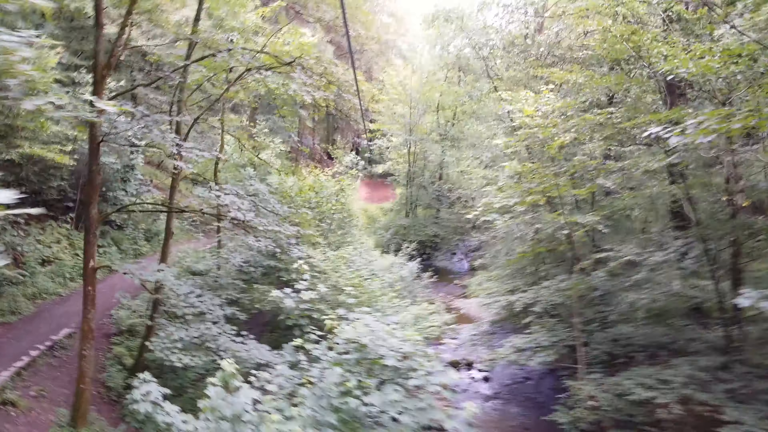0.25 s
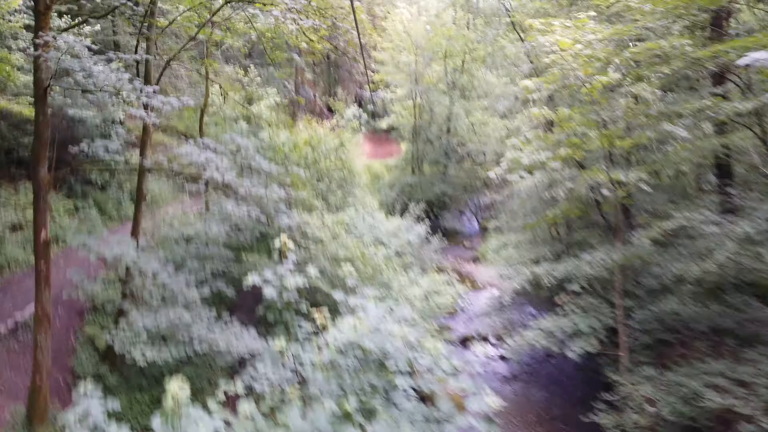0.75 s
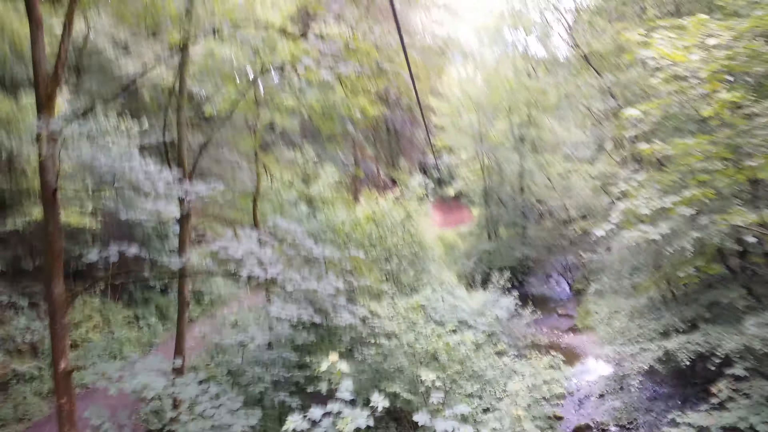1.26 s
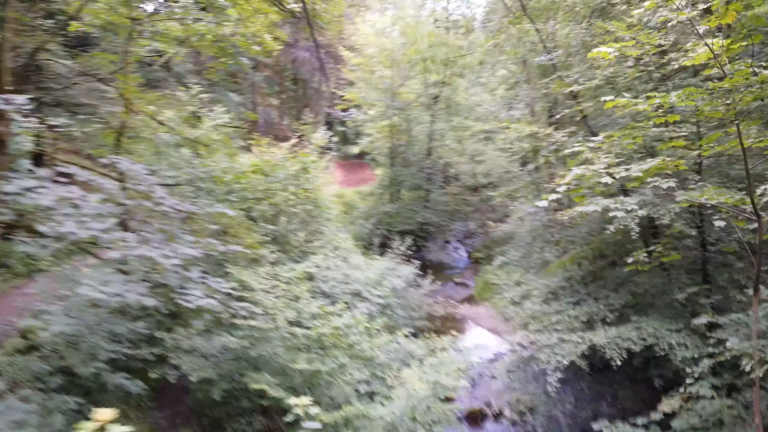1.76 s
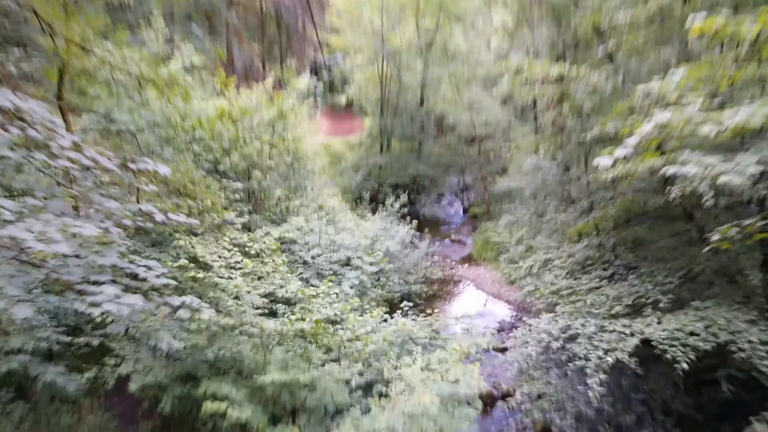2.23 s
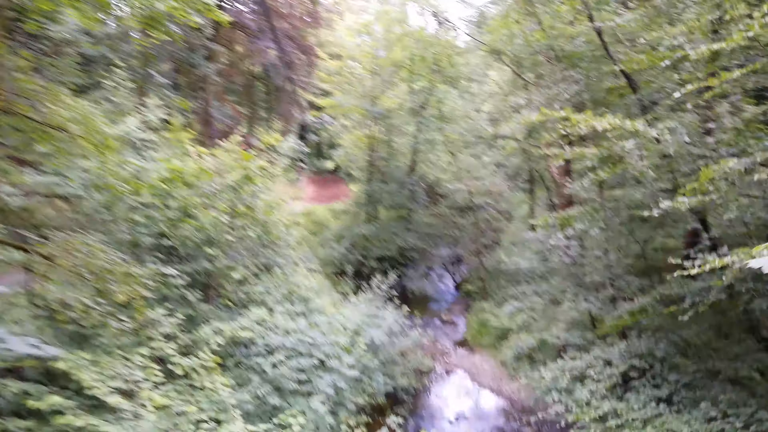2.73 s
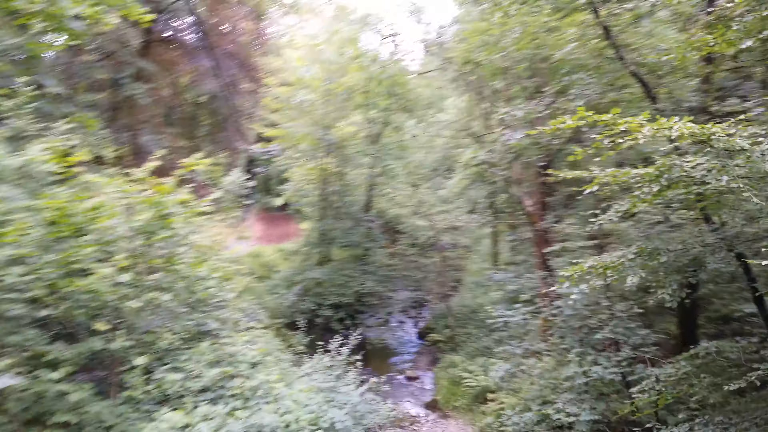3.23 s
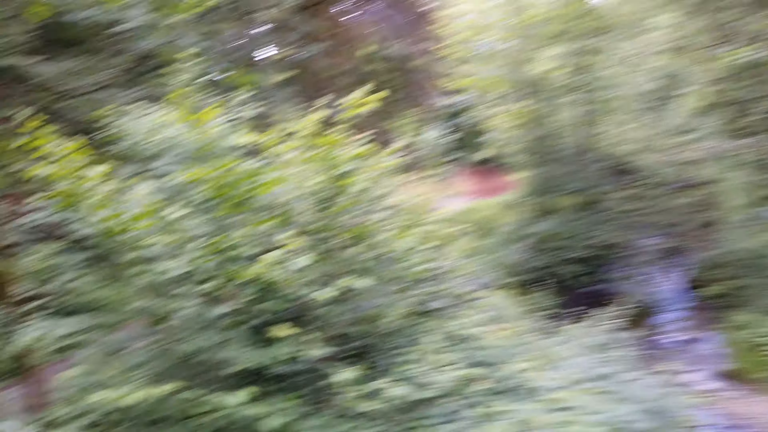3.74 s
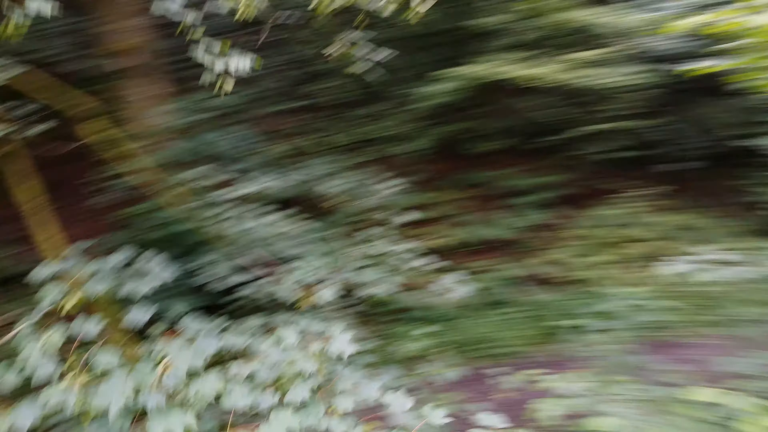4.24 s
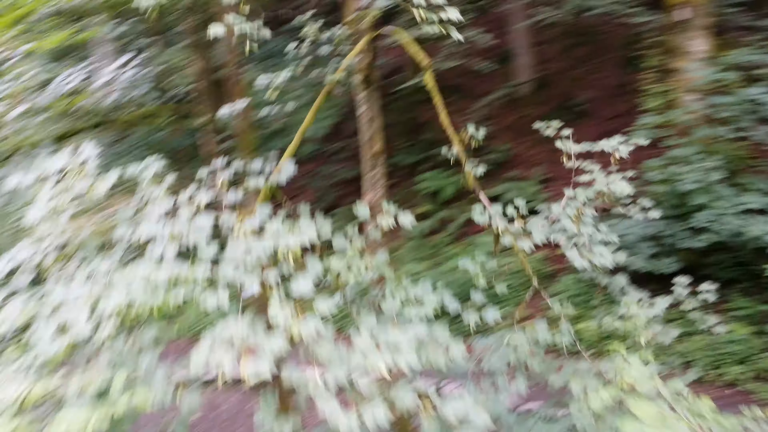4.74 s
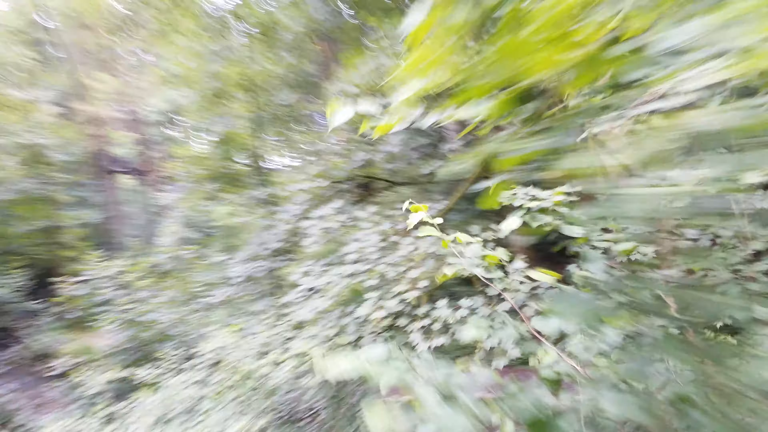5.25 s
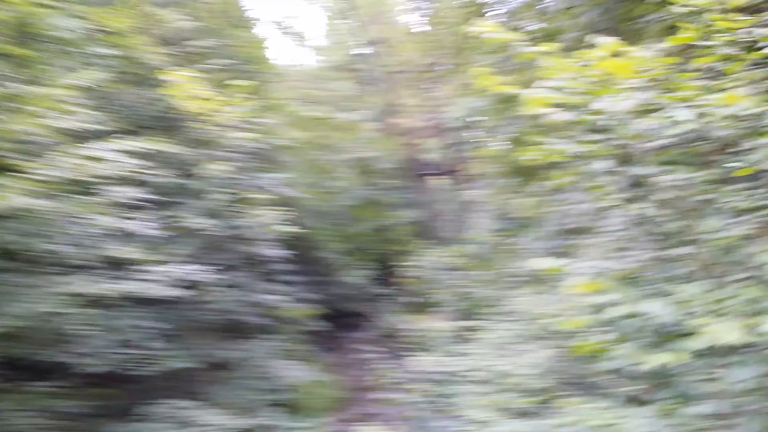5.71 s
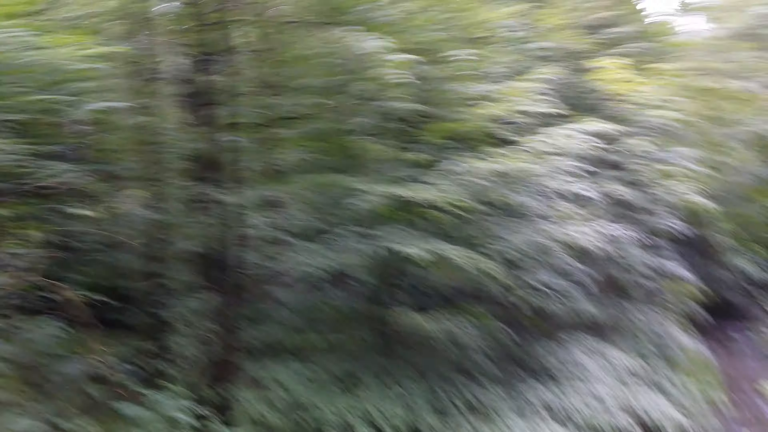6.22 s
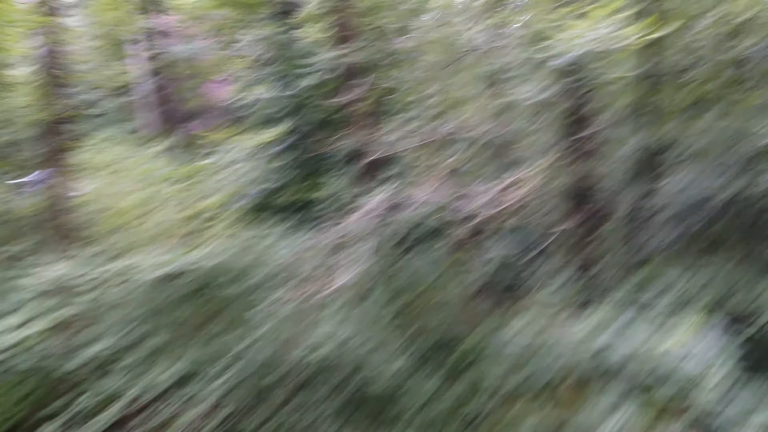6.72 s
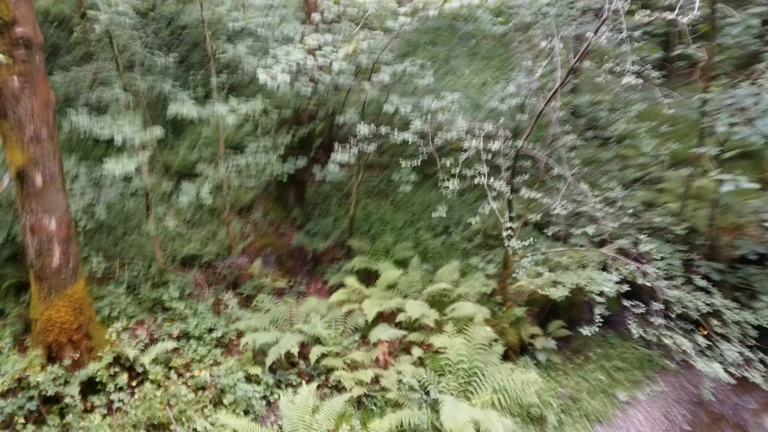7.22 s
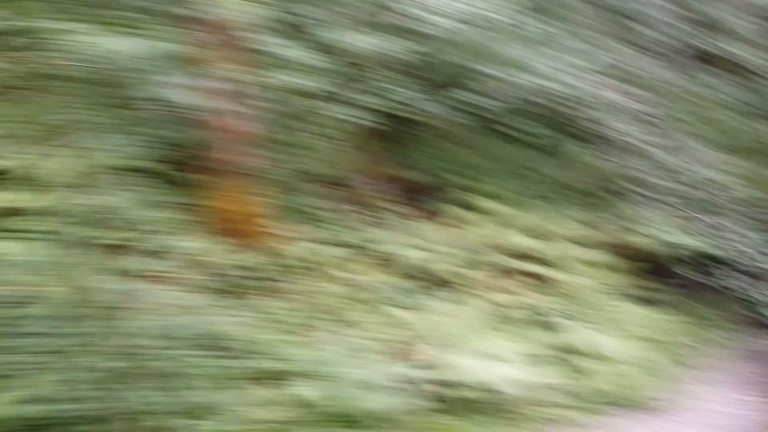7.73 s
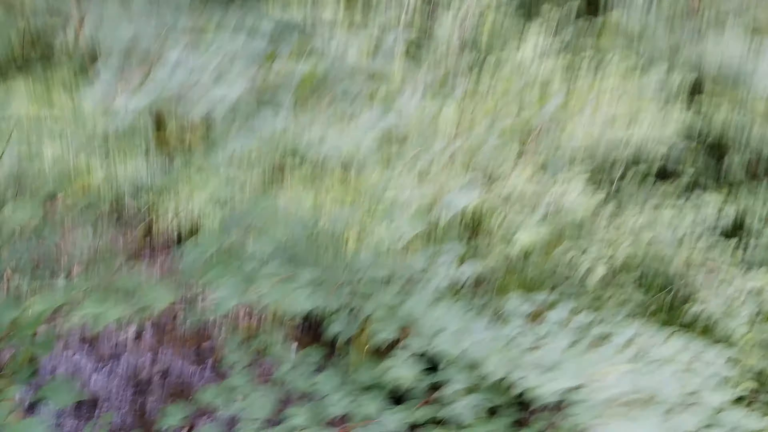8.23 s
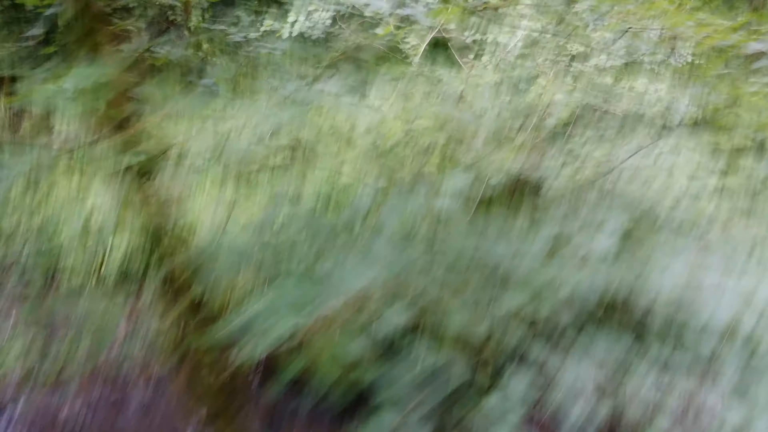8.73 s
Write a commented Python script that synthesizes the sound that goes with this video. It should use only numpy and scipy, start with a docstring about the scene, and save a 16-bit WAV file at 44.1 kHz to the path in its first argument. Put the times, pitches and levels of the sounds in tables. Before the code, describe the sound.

Trolley wheels hiss steadily along a steel cable with a low strand hum, while wind buffets grow into heavy thumps and a twig scrapes past.

```python
"""A rider glides down a zip line through woodland; friction and periodic excitation make the sound.
From the start the trolley's wheels hiss over the stranded cable and hum at the rate at which the strands pass.
The hiss swings between the ears as the rider twists; from about one second, narrow resonances swell and slide.
From halfway turbulence buffets the microphone ports and leaves swish past; then a twig scrapes by on the left
while the rocking trolley whines, and single eddies thump the ports until near the end."""
import sys
import numpy as np
from scipy import signal
from scipy.fft import rfft, irfft, next_fast_len
from scipy.io import wavfile
from scipy.ndimage import map_coordinates

SR = 44100
rng = np.random.default_rng(int(sys.argv[2]) if len(sys.argv) > 2 else 0)


def log_audio(samples):
    """Write samples as a 16-bit WAV file to the path given in sys.argv[1]."""
    # one column per channel
    frames = np.atleast_2d(samples).T
    # limit to full scale, then quantise
    limited = np.clip(frames, -1, 1)
    pcm = np.round(limited * 32767).astype(np.int16)
    wavfile.write(sys.argv[1], SR, pcm)


N = 395577
TIME = np.arange(N) / SR
SIZE = next_fast_len(N)
FREQ = np.maximum(np.arange(SIZE // 2 + 1) * SR / SIZE, 1)


def from_db(db):
    """Logarithmic level: decibels to amplitude gain."""
    return 10 ** (np.asarray(db) / 20)


def rms_one(x):
    """Normalisation: scale to rms 1."""
    return x / np.sqrt(np.mean(x ** 2) + 1e-20)


def in_time(rows):
    """Linear interpolation: each column of a curve at every sample."""
    s, *columns = np.transpose(rows)
    return [np.interp(TIME, s, c) for c in columns]


def in_freq(rows):
    """Interpolation over log frequency: each column of a spectrum at every frequency."""
    hz, *columns = np.transpose(rows)
    return np.array([np.interp(np.log(FREQ), np.log(hz), c) for c in columns])


def shaped(x, gain):
    """Linear filtering: a noise passes through one gain per frequency."""
    return irfft(rfft(x, SIZE) * gain, SIZE)[..., :N]


def peak(hz, width_hz):
    """Lorentzian resonance: power response, 1 on top."""
    return 1 / (1 + (2 * (FREQ - hz) / width_hz) ** 2)


def bell(s, half_s):
    """Gaussian envelope: a smooth rise and fall around a moment, 1 on top."""
    out = np.zeros(N)
    near = slice(*np.searchsorted(TIME, [s - 5 * half_s, s + 5 * half_s]))
    out[near] = np.exp(-((TIME[near] - s) / half_s) ** 2 / 2)
    return out


def drift(rate):
    """Low-passed random process: spread 1, changing about rate times a second."""
    # computed at one sample in 40; the first 2000 values let the filter settle
    r = np.exp(-80 * np.pi * rate / SR)
    slow = signal.lfilter([1], [1, -2 * r, r * r], rng.standard_normal(N // 40 + 2002))[2000:]
    return np.interp(np.arange(N) / 40, np.arange(len(slow)), rms_one(slow))


def contacts(per_s, spread_db, share):
    """Rubbing contact: random clicks of uneven size in a smooth hiss, share being the clicks' power."""
    sizes = from_db(spread_db * np.minimum(rng.exponential(1, N), 4)) * rng.choice([-1, 1], N)
    clicks = rms_one(sizes * (rng.random(N) < per_s / SR))
    share = np.clip(share, 0, 1)
    return np.sqrt(share) * clicks + np.sqrt(1 - share) * rng.standard_normal(N)


def sided(pan_db):
    """Level difference between the ears: the far one is turned down."""
    return from_db(np.minimum([[pan_db], [-pan_db]], 0))


# airflow over the microphone ports, before the trim: (time [s], left level [dB], right level [dB])
AIRFLOW = [(0, -47, -55), (.7, -41, -68), (1.5, -52, -54), (2.8, -48, -75), (3.7, -47, -60),
           (3.95, -49, -37), (4.2, -46, -34.5), (4.4, -33, -44), (4.6, -30.5, -26.5), (4.8, -41, -23.5),
           (5.0, -34, -32), (5.4, -41.5, -37), (5.55, -36, -26), (5.7, -34, -26.5), (6.0, -46, -36.5),
           (6.1, -34, -22.5), (6.3, -33, -30.5), (6.55, -24, -24), (6.75, -49, -22.5), (7.35, -53, -28),
           (7.65, -46, -26.5), (7.9, -74, -29), (8.35, -53, -24.5), (8.6, -75, -24), (8.97, -56, -30.5)]
# gusts that favour one port, before the trim: (time [s], half length [s], level [dB], left minus right [dB])
PORT_GUSTS = [(0.182, 0.017, -40.5, -13), (0.32, 0.018, -41, -11), (0.406, .015, -42.5, -7),
              (1.362, 0.02, -39.5, 4), (2.06, 0.022, -41.5, -20), (2.165, 0.017, -39.5, -22),
              (2.379, 0.0095, -37, 9), (2.943, 0.012, -36, 5), (3.059, 0.018, -38, -7),
              (3.556, 0.024, -36, 35), (3.781, 0.015, -36, 7), (3.909, 0.013, -34.5, 4),
              (4.09, 0.014, -29, -19), (4.797, 0.031, -24, -29), (5.843, 0.025, -27.5, 18),
              (6.285, 0.0069, -18, 22), (6.341, 0.0073, -16.5, 18), (6.463, 0.042, -20.5, 5),
              (6.937, 0.017, -22, -30), (7.561, 0.03, -26, -21), (7.724, 0.024, -18.5, -24),
              (8.302, 0.03, -16.5, -41), (8.769, 0.014, -19, -41)]


def airflow_db():
    """Power addition: the level of the wind at each port is the airflow with the gusts on top."""
    gusts = sum((from_db(db) * sided(pan_db)) ** 2 * bell(s, half_s) for s, half_s, db, pan_db in PORT_GUSTS)
    return 10 * np.log10(from_db(in_time(AIRFLOW)) ** 2 + gusts)


# relative spectrum of the wind: (frequency [Hz], gain [dB])
WIND_SPECTRUM = [(20, -42), (50, -6.5), (95, -0.5), (170, -1.5), (300, -7), (500, -11.5), (900, -18),
                 (2000, -28), (5000, -60)]
TEAR_SLOPE, TEAR_FROM_DB = 0.05, -19   # growth of the upper turbulence [dB per dB], and its reference level


def wind(lumpy_db, flicker_db, steady_above_db, trim_db):
    """Turbulent pressure: lumpy buffets at each port; faint, dull low noise flickers while the wind is weak."""
    gain = from_db(in_freq(WIND_SPECTRUM)[0])
    rumble = 1 / (1 + (FREQ / 330) ** 4)
    ports = []
    for level_db in airflow_db():
        eddies = from_db(lumpy_db * np.minimum(drift(24.0), 1.8))
        white = rng.standard_normal(N)
        # the strongest eddies also tear higher up
        tear = rms_one(white * eddies ** 1.7) * from_db(TEAR_SLOPE * (level_db - TEAR_FROM_DB))
        low = shaped(rms_one(white * eddies), gain * rumble)
        buffets = rms_one(low + shaped(tear, gain * (1 - rumble)))
        # the dull low noise flickers on and off at random
        flicker = from_db(flicker_db * np.tanh(2 * drift(8) - 1))
        dull = rms_one(shaped(rng.standard_normal(N) * flicker, gain / (1 + (FREQ / 215) ** 12)))
        strong = 1 / (1 + from_db(10 * (steady_above_db - level_db)))
        mix = np.sqrt(strong) * buffets + np.sqrt(1 - strong) * dull
        ports.append(mix * from_db(level_db + trim_db))
    return np.array(ports)


# single eddies thump a port: (time [s], nominal level [dB], left minus right [dB])
PORT_THUMPS = [(5.554, -6.5, -22), (5.585, -9.5, -17), (5.64, -9, -18), (6.059, -13.5, -16),
               (6.131, -14, -18), (6.337, -9, 18), (6.444, -14, 3), (6.475, -11, -2), (6.54, -23, 12),
               (6.561, -15, -14), (6.713, -10.5, -32), (6.744, -10, -30), (6.885, -19, -30),
               (6.937, -16, -34), (7.556, -17, 12), (7.728, -18, -22), (7.745, -7.5, -36),
               (8.048, -9.5, -52)]
THUMP_S = 0.0077   # nominal length [s], varied at random
THUMP_EDGE = 0.5   # share of a thump that arrives as a sharp front


def thumps():
    """Pressure pulse: an eddy pushes the membrane in, then tips over with a sharp front and sucks it out."""
    out = np.zeros((2, N))
    for s, db, pan_db in PORT_THUMPS:
        near = np.abs(TIME - s) < 4 * THUMP_S
        u = (TIME[near] - s) / (THUMP_S / 4 * rng.uniform(.75, 1.3))
        u = np.where(u < 0, u * 2, u)   # the push is shorter than the suction
        front = np.tanh(12 * u) * np.exp(-np.abs(u))
        push = (1 - THUMP_EDGE) * 2 * u * np.exp(-u * u) + THUMP_EDGE * front
        out[:, near] -= push * from_db(db) * sided(pan_db)
    return out


# a twig brushes past, level at the left ear: (time [s], level [dB])
TWIG_LEVEL = [(5.04, -75), (5.072, -21), (5.088, -15), (5.122, -15), (5.14, -24.5), (5.22, -26), (5.3, -44)]
# relative spectrum of the scrape: (frequency [Hz], gain [dB])
TWIG_SPECTRUM = [(60, 23), (300, 25), (550, 24.5), (900, 23.5), (1400, 20), (2200, 16), (4000, 17.5),
                 (14000, 9)]
# one swish of leaves, level at the left ear: (time [s], half length [s], level [dB])
LEAF_SWISH = (4.4, .024, -24)
SWISH_HZ, SWISH_WIDTH_HZ = 9060, 3400


def twig(right_db):
    """Frictional noise: leaves swish past, then a twig scrapes by in one short, dull swipe."""
    s, half_s, db = LEAF_SWISH
    rustle = rms_one(shaped(rng.standard_normal(N), np.sqrt(peak(SWISH_HZ, SWISH_WIDTH_HZ))))
    leaves = rustle * bell(s, half_s) * from_db(db)
    scrape = np.array([contacts(per_s=820, spread_db=3.5, share=0.76) for ear in range(2)])
    swipe = rms_one(shaped(scrape, from_db(in_freq(TWIG_SPECTRUM)[0])))
    passing = (TIME > TWIG_LEVEL[0][0]) & (TIME < TWIG_LEVEL[-1][0])
    return (swipe * passing * from_db(in_time(TWIG_LEVEL)[0]) + leaves) * from_db([[0], [right_db]])


# a resonance swells and slides as the wheel flange leans on the cable, level at the right ear:
# (time [s], half length [s], centre [Hz], glide [Hz/s], width [Hz], level [dB])
FLANGE_SWELLS = [(1.103, .7, 6430, 0, 600, -24.5), (1.951, .4, 9600, -1.5, 500, -24),
                 (3.05, .42, 3284, 101.5, 300.2, -32.5), (3.249, 0.23, 10520, 201, 656, -26.5),
                 (3.731, 0.13, 7480, 508, 1000, -17.5), (3.747, 0.067, 4640, 9, 700, -33),
                 (4.076, 0.14, 7650, -1800, 950, -17), (4.272, .08, 9330, 0, 500, -22),
                 (4.896, 0.52, 8460, -9.5, 910, -22), (5.052, 0.11, 9500, 6, 500, -22),
                 (5.846, 0.22, 12460, 1, 1713, -22.5), (5.9, 0.19, 7300, -1500, 900, -21),
                 (6.3, 0.24, 8320, 1492, 800, -23), (6.897, .7, 4696, 0.5, 690, -29),
                 (6.973, 0.3, 9300, -500, 700, -25), (7.299, 0.89, 1273, -61, 169, -36),
                 (7.7, 0.26, 11170, 590.5, 849, -21.5), (7.703, 0.18, 7190, -3.5, 600, -26),
                 (8.3, 0.3, 9510, 101, 520, -19.5), (8.4, .4, 13700, -2, 1400, -28),
                 (8.3, 0.29, 3240, 2, 300, -30.5), (8.676, .22, 10570, 900.5, 1008, -22.5)]


def flange_swells(left_db, uneven_db, wander_hz):
    """Resonant noise: narrow, sliding bands sing out, unsteady in level and pitch, mostly on the right."""
    out = np.zeros((2, N))
    white = rng.standard_normal((2, N)) + 1j * rng.standard_normal((2, N))
    flutter = from_db(uneven_db * np.minimum(drift(16), 1.6))
    wander = wander_hz * drift(9)
    for s, half_s, hz, glide, width, db in FLANGE_SWELLS:
        near = slice(*np.searchsorted(TIME, [s - 3 * half_s, s + 3 * half_s]))
        t = TIME[near] - s
        # each swell takes its own random stretch of the noise
        own = rng.integers(N - len(t) + 1) + np.arange(len(t))
        grain = signal.sosfilt(signal.butter(2, width / 2, fs=SR, output="sos"), white[:, own])
        centre = hz + glide * t + wander[own]
        carrier = np.exp(2j * np.pi * np.cumsum(centre) / SR)
        band = rms_one((grain * flutter[own] * carrier).real)
        out[:, near] += band * from_db(db) * np.exp(-(t / half_s) ** 2 / 2)
    return out * from_db([[left_db], [0]])


# passing strands and their load, before the rock and the unevenness:
# (time [s], passing rate [Hz], fundamental level [dB], octave level [dB])
STRAND_PASSAGE = [(0, 403, -48, -42), (.17, 401.4, -42.5, -44), (.35, 417.4, -46.5, -42.5),
                  (.85, 404, -49.5, -43.5), (1.45, 420, -45, -46), (1.7, 410, -51, -47),
                  (1.92, 423, -46, -47), (2.1, 410, -43.5, -48), (2.45, 423, -47.5, -49),
                  (2.62, 402.5, -52.5, -51), (2.88, 423.6, -46.5, -48.5), (3.55, 411.7, -48.5, -45),
                  (4.4, 432.5, -43.5, -44), (4.6, 403, -51, -42.5), (5.0, 423, -51, -51),
                  (5.2, 412.6, -43, -39.5), (5.45, 414, -51, -43.5), (5.8, 420.7, -48.5, -45),
                  (6.55, 412, -41, -40), (6.9, 406.7, -48, -40), (7.1, 389.6, -46, -39),
                  (7.55, 398.4, -47, -46), (7.75, 423, -51, -41), (8.12, 352.7, -51, -40.5),
                  (8.27, 359.7, -53, -50), (8.45, 405, -52, -43), (8.97, 372, -50, -45)]
# the trolley rocks: (time [s], relative change of the passing rate [fraction], rise of the octave [dB])
TROLLEY_ROCK = [(5.13, 0, 0), (5.17, -.025, 6), (5.21, -.035, 12.5), (5.27, .065, 7.5), (5.3, .05, 0),
                (5.34, -.025, 4), (5.41, -.02, 6), (5.47, .08, 2), (5.52, 0, 0)]


def strand_phase(waver):
    """Phase as the integral of frequency: passing strands, their rate bent by each rock of the trolley."""
    rate_hz = in_time(STRAND_PASSAGE)[0] * (1 + in_time(TROLLEY_ROCK)[0]) * (1 + waver)
    return 2 * np.pi * np.cumsum(rate_hz) / SR


# the lowest partial is faint for a moment: (time [s], half length [s], depth [dB])
FAINT_MOMENTS = [(1.126, 0.049, 22), (2.353, 0.028, 30)]
WHINE_TURN = 0.8   # the rock also turns the left ear to the wheel: dB between the ears per dB of whine


def strand_hum(jitter, sway, rough_db, broken_db, third_db, fourth_db, left_db):
    """Periodic excitation: two wheels bump over the strands, a rolling tone whose octave whines on a rock."""
    _, first_db, octave_db = in_time(STRAND_PASSAGE)
    _, whine_db = in_time(TROLLEY_ROCK)
    faint_db = sum(db * bell(s, half_s) for s, half_s, db in FAINT_MOMENTS)
    loose = from_db(-0.3 * whine_db)   # a wheel pressed hard on the cable runs truer
    partials = (
        (first_db - faint_db, rough_db),
        (octave_db + whine_db, broken_db),
        (octave_db + third_db, broken_db),
        (octave_db + fourth_db, broken_db),
    )
    out = np.zeros((2, N))
    for wheel_gain in (1, 0.68 * loose):
        phase = strand_phase(loose * (jitter * drift(50) + sway * drift(11)))
        for k, (db, uneven_db) in enumerate(partials, 1):
            scatter = .33 * (k - .5) * loose * drift(45)   # radians; higher partials blur more
            ears = np.sin(k * phase + scatter + np.array([[.3], [0]]))
            uneven = np.minimum(drift(19), 1.4) - .35
            out += ears * (np.sqrt(2) * wheel_gain * from_db(db + loose * uneven_db * uneven))
    return out * from_db(np.array([[left_db], [0]]) + WHINE_TURN * whine_db * [[.5], [-.5]])


# hiss of the wheels on the cable, before the trim, flutter and twist: (time [s], level [dB])
HISS_LEVEL = [(0, -16), (1.1, -16.5), (1.6, -15), (3.5, -16), (4.5, -16), (5.5, -15.5), (6.0, -15),
              (7.3, -15), (8.1, -16), (8.97, -16.5)]
# relative spectrum of the hiss at each ear: (frequency [Hz], left gain [dB], right gain [dB])
HISS_SPECTRUM = [(258, -110.5, -99.2), (576, -81, -102), (700, -72, -82.5), (1005, -76, -65),
                 (1500, -79, -64.5), (1580, -74, -60), (2940, -69.5, -58), (3720, -65, -54.5),
                 (4150, -63.5, -61.5), (5050, -63.5, -55), (6520, -56.5, -50), (7530, -56.5, -49),
                 (9230, -68.5, -51), (11680, -61.5, -53), (12000, -74, -56), (15500, -63.5, -62.5)]
# a dip and the resonances of the trolley frame: (centre [Hz], width [Hz], gain [dB])
FRAME_RESONANCES = [(572, 43, -15), (1290, 500, 3.5), (3130, 66, 5.5), (9580, 420, 3)]
# the hiss dips briefly: (time [s], depth [dB])
HISS_DIPS = [(1.081, 1.5), (2.36, 2), (5.16, 3), (5.55, 1.5)]
DIP_HALF_S = 0.028
# the bands of the hiss below HOLLOW_HZ sink for a moment: (time [s], half length [s], depth [dB])
HOLLOW_MOMENTS = [(5.762, 0.051, 10), (5.92, .06, 12), (7.07, .05, 7), (7.46, 0.045, 14), (8.909, 0.08, 21)]
HOLLOW_HZ = 1150
# the rider's twist: (time [s], time by which the left ear leads [ms])
RIDER_TWIST = [(0, .12), (1.0, 0.12), (1.4, 0.18), (2.1, 0.12), (2.9, 0.14), (3.45, 0.11), (4.25, 0.28),
               (4.9, 0.12), (5.45, 0.18), (5.87, .24), (6.4, 0.12), (7.3, 0.093), (7.9, 0.035),
               (8.3, -0.023), (8.7, 0.13), (8.97, 0.06)]
REST_LEAD_MS = 0.08   # lead when the rider faces down the cable
LEFT_DB_PER_MS, RIGHT_DB_PER_MS = 19, -0.5   # twisting turns one ear to the trolley and the other away
# treble against the rest of the hiss: (time [s], left level [dB], right level [dB])
TREBLE_TILT = [(0, -4, 1), (.7, -7, -1), (1.5, -6, -2), (2.4, -4, 0), (3.5, -8, -3), (4.1, -7, -3),
               (4.55, -9.5, -0.8), (5.25, -9, 1), (5.85, -8.5, -2.5), (6.45, -9, 1), (6.9, -12, 2),
               (7.3, -12, 0.5), (7.6, -11.5, 0.5), (8.2, -14, -4.5), (8.7, -11, -4), (8.97, -13, 0.5)]
# added level of the bands above TOP_HZ at the left ear: (time [s], level [dB])
LEFT_TOP_LEVEL = [(0, 2), (3.6, -0.5), (4.5, 5.5), (5.4, 5), (6.4, 5.5), (7.0, 6), (7.9, 7), (8.3, 3),
                  (8.97, 6)]
TOP_HZ = 8700
LOW_FLICKER_DB = 6   # how far the low end of the hiss flickers
RASP_DEPTH = .2      # each passing strand pulses the direct hiss by this share


def wheel_hiss(flutter_db, chatter_db, patchy_db, flicker_db, direct_share, diffuse_hz, bright_hz, trim_db):
    """Friction and interaural delay: contact noise rings the trolley, its lag at the ears set by the twist."""
    lead_ms, = in_time(RIDER_TWIST)
    source = contacts(per_s=3000, spread_db=4.0, share=0.34)
    source = source * (1 + RASP_DEPTH * np.sin(strand_phase(.02 * drift(50))))
    later = map_coordinates(source, [np.arange(N) - lead_ms * SR / 1000], order=3, mode="mirror")
    # the long cable radiates from all along its length, so the top is unrelated between the ears
    diffuse = np.array([contacts(per_s=2800, spread_db=2.5, share=0.17) for ear in range(2)])
    direct = np.clip(direct_share, 0, 1) / (1 + (FREQ / diffuse_hz) ** 4)
    frame_db = sum(db * peak(hz, width) for hz, width, db in FRAME_RESONANCES)
    colour = from_db(in_freq(HISS_SPECTRUM) + frame_db)
    direct_part = rfft([source, later], SIZE) * np.sqrt(direct)
    spectrum = colour * (direct_part + rfft(diffuse, SIZE) * np.sqrt(1 - direct))
    # each band of the hiss swells and flickers at random on its own
    centres = np.append(np.arange(520, 1400, 130), np.geomspace(1550, 14000, 11))   # Hz
    low, top = np.zeros((2, N)), np.zeros((2, N))
    opening = from_db(in_time(LEFT_TOP_LEVEL)[0])
    hollow = from_db(-sum(db * bell(s, half_s) for s, half_s, db in HOLLOW_MOMENTS))
    for hz, pick in zip(centres, np.eye(len(centres))):
        band = irfft(spectrum * np.interp(FREQ, centres, pick), SIZE)[:, :N]
        if hz < HOLLOW_HZ:
            band *= hollow
        low_end = 1 / (1 + (hz / 900) ** 4)   # the low end flickers most
        patches = np.minimum(drift(8 + 8 * low_end), 1.6)
        patches_db = (patchy_db + LOW_FLICKER_DB * low_end) * patches - LOW_FLICKER_DB * low_end / 2
        band *= from_db(patches_db + flicker_db * drift(50))
        if hz > TOP_HZ:
            band[0] *= opening
        high = 1 / (1 + (bright_hz / hz) ** 8)
        low += (1 - high) * band
        top += high * band
    # half of the tilt lifts the top, half lowers the rest
    tilt = from_db(np.array(in_time(TREBLE_TILT)) / 2)
    hiss = (low / tilt + top * tilt) / np.std(low + top)
    level_db = in_time(HISS_LEVEL)[0] + trim_db + flutter_db * drift(17) + chatter_db * drift(180)
    dips_db = sum(db * bell(s, DIP_HALF_S) for s, db in HISS_DIPS)
    turn_db = (lead_ms - REST_LEAD_MS) * np.array([[LEFT_DB_PER_MS], [RIGHT_DB_PER_MS]])
    return hiss * from_db(level_db - dips_db + turn_db)


def scene():
    """Superposition: trolley overhead, air and leaves at the microphone."""
    hiss = wheel_hiss(flutter_db=0.23, chatter_db=.5, patchy_db=1.08, flicker_db=1.15,
                      direct_share=0.59, diffuse_hz=9400, bright_hz=6749, trim_db=-1.75)
    swells = flange_swells(left_db=-16.5, uneven_db=1.4, wander_hz=70)
    # jitter and sway are fractions of the passing rate
    hum = strand_hum(jitter=.017, sway=.011, rough_db=3.0, broken_db=3.4,
                     third_db=-5.0, fourth_db=-7.5, left_db=-6.5)
    air = wind(lumpy_db=2.8, flicker_db=13, steady_above_db=-39.5, trim_db=-1.5)
    return hiss + swells + hum + air + thumps() + twig(right_db=-23.0)


CUTOFF_HZ = 14650


def record(dry):
    """Saturation and band limiting: the highest peaks are rounded and the top is cut steeply."""
    rounded = dry / (1 + np.abs(dry / .9) ** 6) ** (1 / 6)
    return signal.sosfilt(signal.ellip(12, .1, 80, CUTOFF_HZ, fs=SR, output="sos"), rounded)


dry = scene()
out = record(dry)
log_audio(out)
```